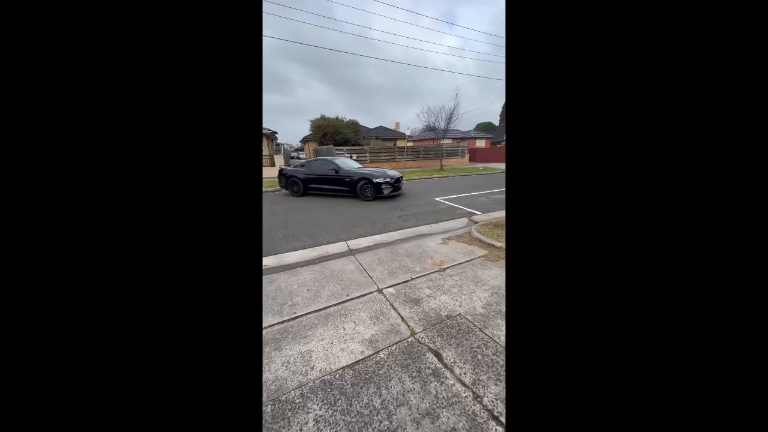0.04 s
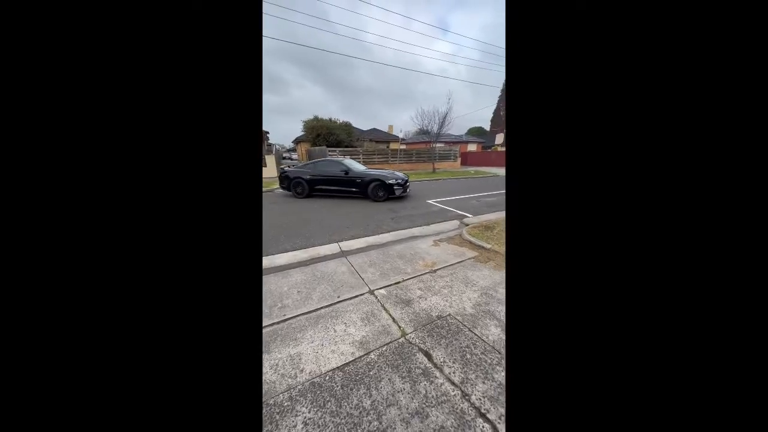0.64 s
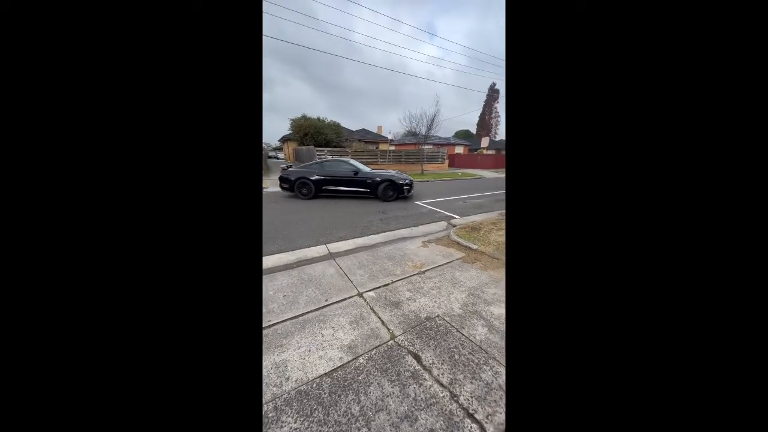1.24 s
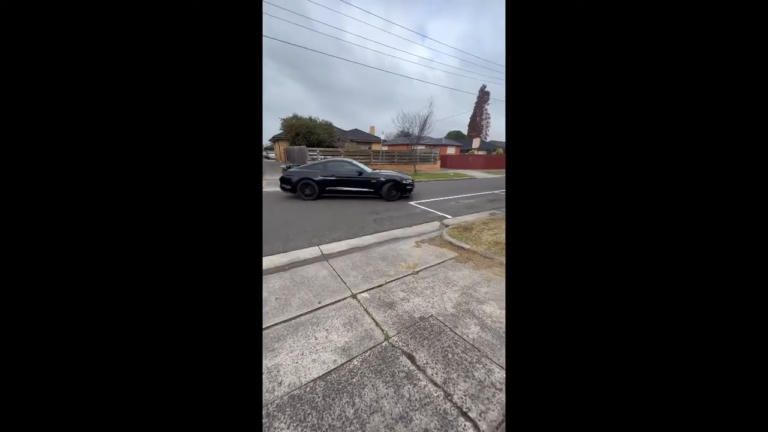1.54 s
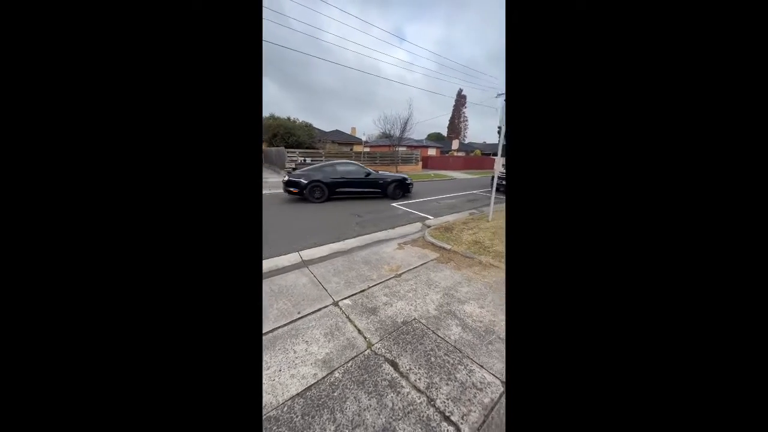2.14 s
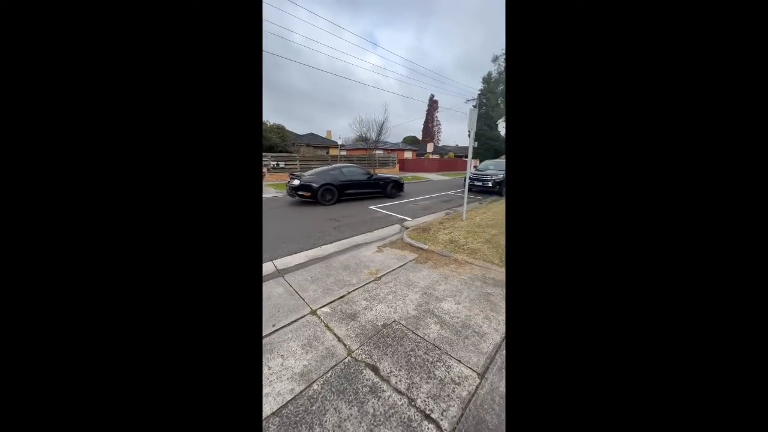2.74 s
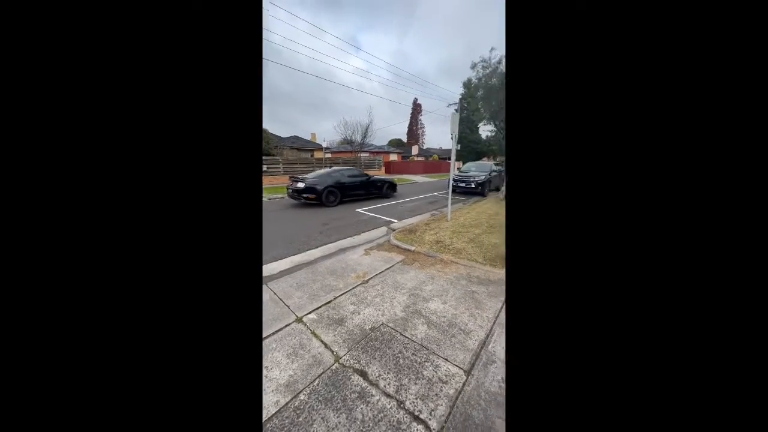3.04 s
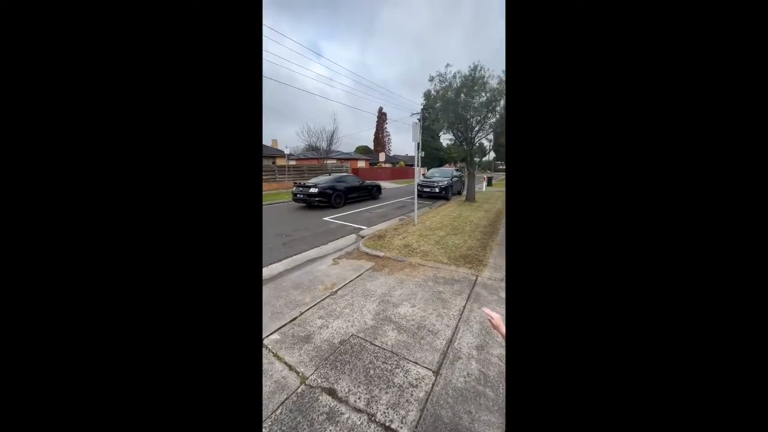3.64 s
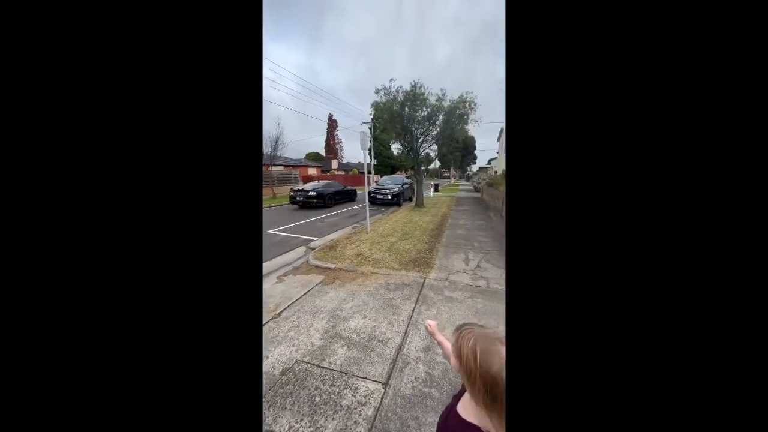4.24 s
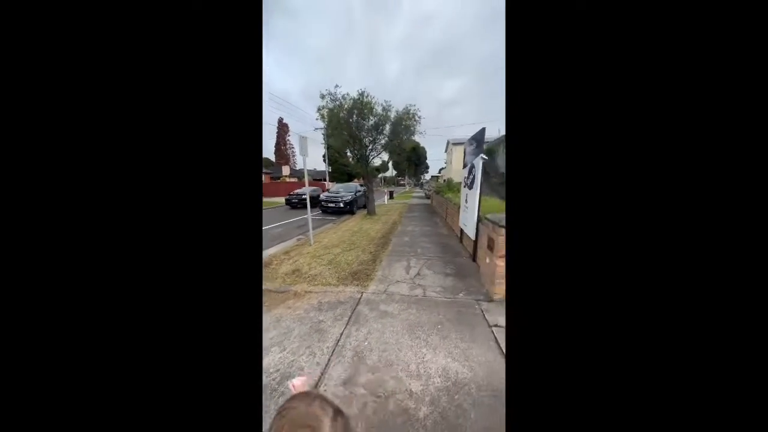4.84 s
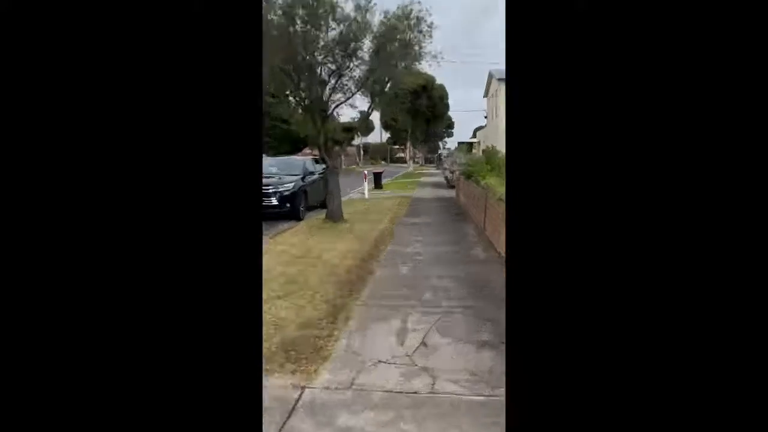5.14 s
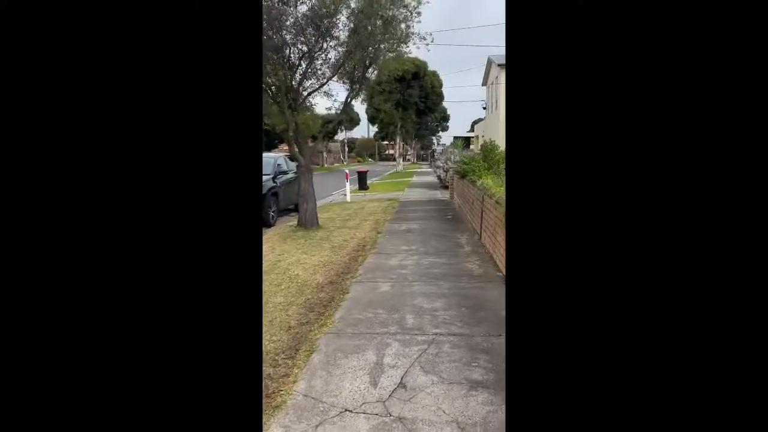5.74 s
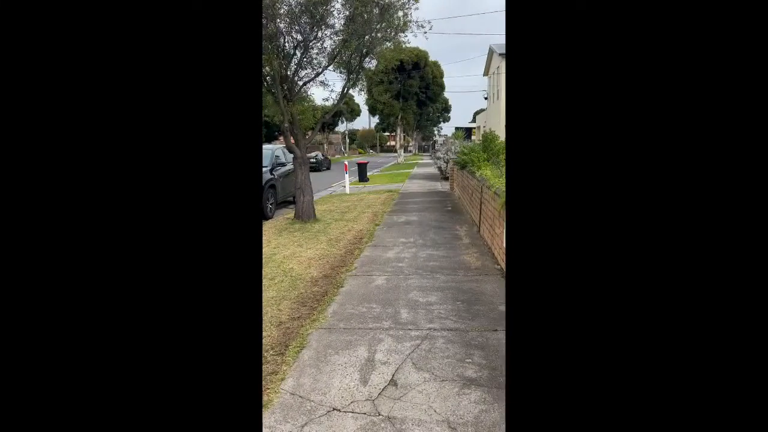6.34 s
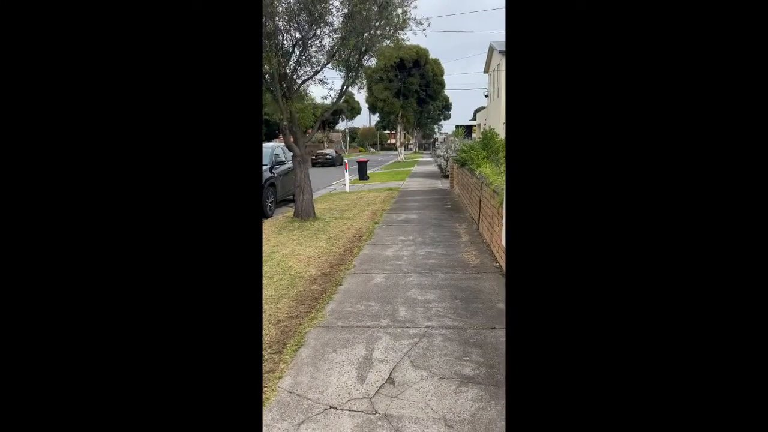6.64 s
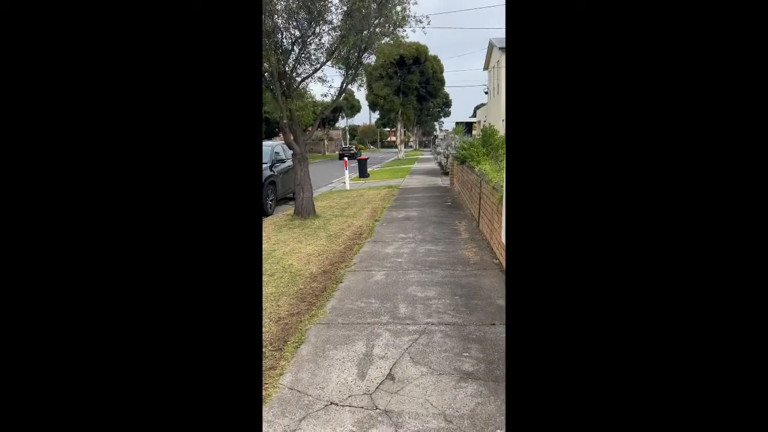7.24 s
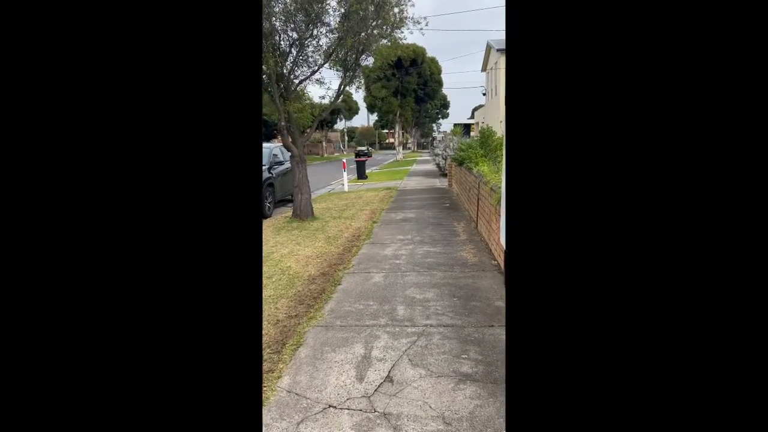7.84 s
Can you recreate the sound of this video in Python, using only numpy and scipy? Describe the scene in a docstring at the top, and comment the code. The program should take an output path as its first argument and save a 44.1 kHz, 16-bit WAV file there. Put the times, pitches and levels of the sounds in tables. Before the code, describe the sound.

A deep, loping V8 rumble is heard from the footpath of a suburban street, with a few ticks of grit, a soft tyre hiss and faint bird chirps. The car accelerates away with a loud growl that climbs in pitch, sags for a moment, then rises much higher and turns raspy. Finally the driver lifts off, leaving a quieter, lower hum echoing off the houses.

```python
"""A suburban corner: a V8 sports car idles, creeps round, accelerates away and lifts off.
The crank sets the period of the exhaust. Uneven pulses from two cylinder banks excite the pipe
resonances, and under load they steepen into shocks that rasp. Road, walls and house fronts reflect
the sound. Tyres and engine bay hiss, grit ticks under the wheels and small birds chirp."""
import sys
import numpy as np
from scipy import signal
from scipy.fft import rfft, irfft, next_fast_len
from scipy.io import wavfile
from scipy.ndimage import uniform_filter1d, minimum_filter1d, map_coordinates

SR = 44100
rng = np.random.default_rng(int(sys.argv[2]) if len(sys.argv) > 2 else 0)


def file_out(sig):
    """Save sig as 16-bit WAV at sys.argv[1]."""
    # one column per channel
    cols = np.atleast_2d(sig).T
    # limit, then scale
    lim = np.clip(cols, -1, 1)
    pcm = np.round(lim * 32767).astype(np.int16)
    wavfile.write(sys.argv[1], SR, pcm)


N = 352359

# crank speed through idle, creep, first gear, second gear and lift-off: time_s, speed_rpm
CRANK_SPEED = [(0.0, 655), (0.65, 640), (1.2, 655), (1.5, 794), (1.75, 876), (2.4, 905), (2.7, 995),
               (2.9, 1105), (3.3, 1570), (3.5, 1885), (4.0, 2535), (4.28, 2979), (4.4, 3024), (4.6, 2644),
               (4.73, 2680), (4.9, 2893), (5.5, 3507), (5.75, 3759), (5.95, 4009), (6.2, 4271), (6.4, 4542),
               (6.65, 4733), (6.9, 4993), (7.05, 5092), (7.24, 5238), (7.6, 3936), (8.0, 3864)]
# how hard the engine works: time_s, effort_db
EFFORT = [(0, -24), (1.3, -25.5), (1.6, -17), (2.7, -14.5), (3.05, -10), (3.4, -3), (3.6, -1.5), (3.9, 0.9),
          (4.4, -0.15), (4.6, -2.5), (4.8, -4.5), (5.3, -7), (5.6, -6), (5.95, -7), (6.4, -4.5),
          (6.6, -2.5), (6.9, -0.5), (7.1, -1.5), (7.3, -2.5), (7.55, -17), (7.75, -24)]
# scatter from firing to firing: time_s, scatter_share
ROUGHNESS = [(2.8, .14), (3.6, .1), (4.4, .07), (5.3, .04), (5.8, .09), (7.05, .07), (7.6, .1)]
# each cylinder's shock, lags in firing intervals: side_lag, side_db, behind_lag, behind_db
SHOCKS = [(.15, 0, -.03, 0), (-.05, -7, -.4, -12), (.1, -14, -.2, -13), (.33, -2, .13, -18),
          (0, -30, 0, -21), (.12, -4, -.07, 0), (.28, -7, -.5, -11), (0, -30, 0, -18)]
# the street's echo of the exhaust: time_s, level_db
STREET_ECHO = [(3, -7), (3.5, -15), (4.6, -18), (7.25, -16), (7.6, -3)]
# spectrum of the hiss: frequency_hz, level_db
HISS_COLOUR = [(3000, 1.5), (4800, 1.5), (5600, 1.5), (7200, -1), (8800, -1.5), (10800, -7), (12200, -17),
               (15500, -14.5)]
# the car starts to pull, turns its tail to the listener, then coasts: start_s, end_s
PULL_S, TURN_S, COAST_S = (3.0, 3.34), (5.5, 6.2), (7.35, 7.7)


def amp(db):
    """Decibels to amplitude ratio."""
    return 10 ** (np.asarray(db) / 20)


def unit(x):
    """Normalisation to rms 1."""
    return x / np.sqrt(np.mean(x ** 2) + 1e-20)


def steady(x, seconds=0.12):
    """Division by the running rms levels x; faster throbs remain."""
    size = int(seconds * SR)
    power = uniform_filter1d(uniform_filter1d(x ** 2, size), size // 2 + 1)
    return x / np.sqrt(np.abs(power) + 1e-14)


def along(points, hz):
    """Interpolation on a logarithmic frequency axis."""
    knots_hz, values = np.transpose(points)
    return np.interp(np.log(hz + 1), np.log(knots_hz + 1), values)


def curve(points):
    """Linear interpolation in time, one value per sample."""
    return np.interp(np.arange(N) / SR, *np.transpose(points))


def ramp(start_s, end_s):
    """A linear rise from 0 to 1."""
    return np.clip((np.arange(N) / SR - start_s) / (end_s - start_s), 0, 1)


def wobble(rate_hz):
    """Smooth random modulation: a spline through Gaussian knots."""
    knots = rng.standard_normal(int(N * rate_hz / SR) + 4)
    return map_coordinates(knots, [np.arange(N) * rate_hz / SR])


def filtered(x, response):
    """Linear filtering: the spectrum times a frequency response."""
    size = next_fast_len(N + SR // 2)
    return irfft(rfft(x, size) * response(np.fft.rfftfreq(size, 1 / SR)), size)[..., :N]


def coloured(x, colour, size=8192):
    """Minimum-phase filtering: folding the cepstrum makes the response causal."""
    cepstrum = irfft(np.log(amp(along(colour, np.fft.rfftfreq(size, 1 / SR)))))
    cepstrum[1:size // 2] *= 2
    cepstrum[size // 2 + 1:] = 0
    return signal.fftconvolve(x, irfft(np.exp(rfft(cepstrum))))[:N]


def band(x, lo_hz, hi_hz, order=12):
    """A zero-phase band-pass filter."""
    return filtered(x, lambda hz: ((1 + (lo_hz / (hz + 1)) ** order) * (1 + (hz / hi_hz) ** order)) ** -.5)


def delayed(x, delay_s):
    """Propagation delay over a changing path."""
    return np.interp(np.arange(N) - delay_s * SR, np.arange(N), x)


def noise(colour):
    """Stereo noise of rms 1, most coherent at long wavelengths."""
    # likeness of left and right: frequency_hz, correlation
    coherence = [(100, .99), (1200, .96), (2200, .88), (4000, .76), (8000, .64), (13000, .4)]

    def response(hz):
        angle = np.arccos(along(coherence, hz)) / 2
        return amp(along(colour, hz)) * [np.cos(angle), np.sin(angle)]

    mid, side = filtered(rng.standard_normal((2, N)), response)
    return unit(np.array([mid + side, mid - side]))


def echo(x, delay_s=.02):
    """Scattering from fences and house fronts leaves a tail whose treble dies first."""
    # reverberation time of the street: frequency_hz, t60_s
    decay = [(100, 1), (1000, 0.54), (4000, 0.09), (12000, 0.018)]
    hz, t, spectra = signal.stft(rng.standard_normal(SR // 2), SR, nperseg=256)
    tail = signal.istft(spectra * amp(-60 * t / along(decay, hz)[:, None]), SR, nperseg=256)[1]
    return signal.fftconvolve(x, np.pad(tail / np.linalg.norm(tail), (int(delay_s * SR), 0)))[:N]


def spread(x, wet_db):
    """Diffuse reflection gives each ear its own echo."""
    return (x + amp(wet_db) * np.array([echo(x), echo(x)])) / np.hypot(1, amp(wet_db))


def street():
    """Broadband ambient noise, quietening as the car leaves."""
    # background spectrum: frequency_hz, level_db
    colour = [(120, -33), (200, -24), (287, -9.5), (540, -19), (775, -22), (1490, -26.5), (5550, -37),
              (10500, -46.5), (11200, -63), (11900, -91), (15000, -71)]
    return amp(-45 - 8 * ramp(5.5, 7)) * noise(colour)


def birds():
    """Gliding whistles with two overtones; random frequency modulation makes them hoarse."""
    # chirps: start_s, length_s, start_hz, middle_hz, end_hz, level_db, overtone_db, hoarseness
    chirps = [(0.033, 0.045, 3720, 3900, 3840, -45, -10, 0.47),
              (0.065, 0.085, 6180, 5400, 5150, -43.5, -18, 0.96),
              (0.503, 0.12, 3600, 3780, 3620, -45, -13, 1.5), (1.554, 0.1, 2850, 3350, 3200, -41, -3, 0.02),
              (1.745, 0.023, 3500, 3740, 3600, -31.5, -28, 0.1),
              (1.805, 0.082, 2940, 3110, 3120, -43, 0, 0.04),
              (2.646, 0.079, 3700, 3910, 3720, -43.5, -11, 1.6),
              (3.093, 0.38, 3000, 3030, 3010, -45.5, -25, 0.13),
              (3.417, 0.072, 4740, 4730, 4700, -37.5, -20, 0.12),
              (3.461, 0.059, 3340, 3670, 3250, -34.5, -7, 0.4),
              (3.511, 0.042, 4420, 4230, 3430, -34, -29, 0.17),
              (3.593, 0.042, 3210, 3250, 3120, -40, -21, 0.03),
              (7.56, 0.099, 3030, 3320, 3200, -75, 19, 0.1), (7.668, 0.092, 3350, 3310, 3280, -56, -4, 0),
              (7.813, 0.091, 3000, 3200, 3280, -62, 1, 0.1), (7.93, 0.09, 3170, 3280, 3150, -73, 4, 0.1)]
    song = np.zeros(N + SR)
    for start_s, length_s, *glide_hz, level_db, overtone_db, hoarseness in chirps:
        progress = np.linspace(0, 1, int(length_s * SR))
        pitch_hz = np.polyval(np.polyfit([0, .5, 1], glide_hz, 2), progress)
        flutter = np.interp(progress * length_s * 1500, np.arange(SR), rng.standard_normal(SR))
        phase = 2 * np.pi * np.cumsum(pitch_hz * (1 + 0.161 * hoarseness * flutter)) / SR
        tone = np.sin(phase) + amp(overtone_db) * (np.sin(2 * phase) + amp(-6.5) * np.sin(3 * phase))
        song[round(start_s * SR):][:len(tone)] += amp(level_db) * np.sin(np.pi * progress) * tone
    return spread(song[:N], wet_db=-8)


def grit(t60_s=.02):
    """Impact noise: stones snap under the tread in exponentially decaying bursts."""
    # snaps: start_s, level_db
    snaps = [(0.9683, -30.5), (1.0056, -28), (1.0977, -25.5), (1.209, -34), (1.3142, -28.5), (1.422, -25.5),
             (1.6462, -29), (2.8676, -43)]
    colour = [(200, -17), (600, 9), (1300, 6), (2800, -2.5), (5000, -26), (12000, -39)]
    ticks, t = np.zeros(N + SR), np.arange(SR // 10) / SR
    for start_s, level_db in snaps:
        envelope = amp(level_db + 2 - 60 * t / t60_s)
        ticks[round(start_s * SR):][:len(t)] += envelope * rng.standard_normal(len(t))
    return spread(coloured(ticks[:N], colour), wet_db=-8)


def scrub(fade_s=.07):
    """Friction noise: steered rubber twists on the asphalt with a grainy hiss."""
    # steering movements: start_s, length_s, level_db
    scrubs = [(0.818, 1.27, -49.5), (1.668, 0.34, -50), (2.046, 0.24, -50.5)]
    level = sum(amp(db) * (ramp(s, s + fade_s) - ramp(s + length_s - fade_s, s + length_s))
                for s, length_s, db in scrubs)
    return level * amp(1.8 * wobble(9.3) + 1.7 * wobble(300)) * noise(HISS_COLOUR)


def per_firing(cycle):
    """Random modulation with one knot at each of a cycle's eight firings."""
    return map_coordinates(rng.standard_normal(N // 50), [cycle * 8], order=2, mode="wrap")


def flow(cycle):
    """Flow noise: the rush of tyres and engine bay and a hiss grow with effort and flutter with firings."""
    # spectrum of the rush: frequency_hz, level_db
    rush_colour = [(300, -31), (600, 22), (1100, 14), (1600, 9.5), (2200, 9.5), (2700, 1.5), (3800, 0.5),
                   (4800, -7.5), (6000, -74), (9000, -63)]
    effort_db, coasting = curve(EFFORT), ramp(*COAST_S)
    rush = amp(-33.5 + 0.86 * effort_db + 7.4 * coasting + 2 * per_firing(cycle)) * noise(rush_colour)
    hiss = amp(-40.5 + effort_db - 8 * coasting + 1.8 * per_firing(cycle)) * noise(HISS_COLOUR)
    return rush + hiss


def overrun(cycle):
    """With the throttle shut, a few orders (harmonics of the four-stroke cycle rate) hum on."""
    # partials of the hum: order, level_db
    partials = {2: -46.5, 5: -52, 6: -48, 7: -41.5, 8: -36, 11: -38.5, 12: -47, 13: -50.5}
    # its swell as the throttle shuts: time_s, gain_db
    swell = [(7.15, -90), (7.33, 6), (7.42, 6), (7.56, 7), (7.7, 0), (7.99, -0.5)]
    hum = sum(amp(db + 0.5 * wobble(9.9)) * np.cos(2 * np.pi * order * cycle + 0.39 * wobble(9.1))
              for order, db in partials.items())
    return np.sqrt(2) * amp(curve(swell)) * hum


def stages():
    """Crossfade weights for creeping, pulling side-on and being heard from behind."""
    pulling, behind = ramp(*PULL_S), ramp(*TURN_S)
    return 1 - pulling, pulling - behind, behind


def firings(cycle, lags, strengths_db, without=(), size=4096):
    """Fourier series of one pulse per cylinder per cycle, less the listed orders."""
    slots = (np.arange(len(lags)) + lags) / len(lags)
    harmonics = np.exp(-2j * np.pi * np.outer(np.arange(size // 16), slots)) @ amp(strengths_db)
    harmonics[[0, *without]] = 0
    return unit(np.interp(cycle % 1, np.arange(size) / size, irfft(harmonics, size)))


def shocks(cycle, lags, strengths_db, puff_s):
    """Each shock front trails a decaying puff of turbulence."""
    rough = curve(ROUGHNESS)
    pulses = firings(cycle + .001 * per_firing(cycle), lags, strengths_db)
    pulses *= np.exp(2 * rough * per_firing(cycle))
    puff_power = signal.lfilter([1], [1, -np.exp(-1 / (puff_s * SR))], pulses ** 2)
    return unit(pulses) + 5 * rough * unit(np.sqrt(puff_power) * rng.standard_normal(N))


def tailpipes(x):
    """Pipe modes ring; interference with the road's reflection adds a comb that rises with distance."""
    # tailpipe modes: centre_hz, width_hz, level_db
    modes = [(870, 160, -2.5), (1268, 320, -2.5), (1740, 130, -2.5), (2390, 470, -7.5), (3220, 580, -0.5),
             (3930, 810, -5.5), (5080, 500, -13.5)]
    # lag of the road's reflection: time_s, delay_s
    road_lag = [(6, .0015), (6.45, .00125), (6.8, .00106), (6.95, .00097), (7.25, .00081)]

    def response(hz):
        return sum((-1) ** k * amp(db) * 1j * hz * width / (centre ** 2 - hz ** 2 + 1j * hz * width)
                   for k, (centre, width, db) in enumerate(modes))

    direct = filtered(x, response)
    return direct + 0.8 * delayed(band(direct, 1400, 9000, order=6), curve(road_lag))


def rasp(cycle):
    """Nonlinear steepening: under load the pulses become shocks, rich in high harmonics."""
    # side-on spectrum: frequency_hz, level_db
    colour = [(500, -53), (720, -6.5), (900, -6.5), (1100, -9), (1400, -11), (1750, -21), (2100, -29.5),
              (3000, -42.5), (6000, -23), (12000, -25)]
    # reflections from road, kerb and underbody: delay_s, gain
    bounces = [(.0011, 0.25), (.0027, -0.13), (.0046, .4), (.0072, 0.045)]
    # the rasp's body, dipping in the shadow of a parked car: time_s, gain_db
    shade = [(3.5, -4), (4.3, 0.5), (5.2, 2), (5.6, -1), (6.1, -4.5), (6.6, -1), (7.2, -3.5)]
    # echo, strong in that shadow and at lift-off: time_s, level_db
    reflected = [(3.55, 3), (3.9, -11), (4.4, -12), (4.8, -18), (5.3, -16), (5.8, -5), (6.4, -2),
                 (6.8, -12), (7.05, -12), (7.25, -6), (7.6, 3)]
    # brassy overtones: time_s, level_db
    brass_level = [(2.8, -78), (3.2, -60), (3.9, -85), (4.4, -44), (4.7, -53), (5.2, -35), (5.7, -58),
                   (6.1, -40), (6.4, -40), (7.3, -44), (7.6, -53)]
    # bright edge heard from behind: time_s, level_db
    edge_level = [(5.8, -58), (6.35, -46.5), (6.7, -36.5), (6.82, -32.5), (6.92, -30.5), (7.04, -29.5),
                  (7.14, -40), (7.3, -34.5), (7.45, -47.5)]
    side_lags, side_db, behind_lags, behind_db = np.transpose(SHOCKS)
    side = coloured(shocks(cycle, side_lags, side_db, puff_s=.002), colour)
    side = filtered(side, lambda hz: 1 + sum(gain * np.exp(-2j * np.pi * hz * s) for s, gain in bounces))
    behind = tailpipes(shocks(cycle, behind_lags, behind_db, puff_s=.0015))
    turned, wet = ramp(5.82, 6.36), amp(curve(reflected))
    body = np.sqrt(1 - turned) * steady(band(side, 780, 1800))
    body += np.sqrt(turned) * steady(band(behind, 720, 2050))
    octaves = np.log2(curve(CRANK_SPEED) / 3000)
    body_db = -28 + 0.91 * curve(EFFORT) + 4 * octaves + 2.5 * ramp(*COAST_S) + curve(shade)
    body = amp(body_db) * ramp(3.5, 3.501) * steady(body + wet * echo(body))
    brass = amp(curve(brass_level)) * ramp(2.7, 3) * steady(band(side, 1850, 2600))
    edge = steady(band(behind + wet * echo(behind), 1470, 7800))
    edge *= amp(curve(edge_level)) * ramp(5.55, 5.551) * (1 - ramp(6.8, 7.7))
    return spread(body, wet_db=-22) + spread(brass + edge, wet_db=-9)


def silencer(hz, trips_s=(.0031, .0053), bounce=0.55):
    """All-pass response: round trips in the chambers smear each pulse without colouring it."""
    delays = np.exp(-2j * np.pi * np.outer(trips_s, hz))
    return np.prod((delays - bounce) / (1 - bounce * delays), axis=0)


def walls(x):
    """Interference with wall reflections fades the orders in and out as the detours shrink."""
    # reflections: near_delay_s, far_delay_s, gain
    paths = [(0.01219, 0.00786, 0.59), (0.0062, .0042, -0.27)]
    away = ramp(PULL_S[0], COAST_S[1])
    reflected = sum(gain * delayed(x, near_s + (far_s - near_s) * away) for near_s, far_s, gain in paths)
    return x + ramp(*PULL_S) * reflected


def radiation(growth, creep_db, pull_db, behind_db, coast_db):
    """Directivity and load set a band's gain; growth is in dB per dB of effort."""
    creeping, pulling, behind = stages()
    facing_db = creeping * creep_db + pulling * pull_db + behind * behind_db
    return amp(growth * curve(EFFORT) + facing_db + coast_db * ramp(*COAST_S))


def beat(cycle):
    """Source and filter: uneven pulses of the two banks ring the pipes in a ragged beat."""
    # cylinders in firing order: lag_intervals, creep_db, pull_db, behind_db
    cylinders = [(-0.029, 6, -3.5, 1.5), (-0.0825, -6, -1, 10.5), (-0.00093, 5.5, 3.5, -24),
                 (-0.0394, 10, 7, 11.5), (-0.031, -30, -8, -59), (-0.049, 6.5, 3, 1.5),
                 (0.0426, 5.5, 3, 16), (0.129, -0.5, -0.5, 1)]
    # pipe response: frequency_hz, creep_db, pull_db, behind_db
    pipe = [(31.5, -0.5, 13, 14), (49.6, 10, -15, -8), (69.6, -9.5, 25, 11), (87, -9, -34, -28),
            (117, -5.5, 7, -7.5), (157, -18, 9, -4.5), (234, -14.5, 11.5, 8.5), (288, -11, -1.5, -12),
            (353, -15, 7.5, -12), (457, -27, -2, -7.5), (684, -28.5, -5, -10), (790, -55, -22, -23.5),
            (900, -41.5, -21.5, -31.5)]
    # orders left out of the pulses, one row for each stage
    omitted = [
        [1, 2, 3, 5, 6, 8, 9, 16],
        [1, 2, 3, 4, 5, 6, 8, 15, 16],
        [1, 2, 5, 6, 9, 11],
    ]
    # the beat gives way to the drone: time_s, gain_db
    raggedness = [(3.85, -1), (4.2, -6.5), (4.9, -3.5), (5.5, -4), (6.2, -2.5)]
    lags, *strengths = np.transpose(cylinders)
    hz, *colours = np.transpose(pipe)
    rough = curve(ROUGHNESS)
    jitter = .006 * rough * per_firing(cycle)
    chuff = amp(-13) * ramp(*PULL_S) * rng.standard_normal(N)  # turbulent gas under load
    gas = 0
    for share, strengths_db, colour_db, orders in zip(stages(), strengths, colours, omitted):
        pulses = firings(cycle + jitter, lags, strengths_db, without=orders)
        pulses *= 1 + rough * per_firing(cycle) + chuff
        gas += share * steady(coloured(pulses, np.c_[hz, colour_db]))
    gas = walls(filtered(gas, silencer))
    first_rev = ramp(3.55, 3.75) - ramp(4.0, 4.3)
    gas += 0.52 * first_rev * band(gas, 325, 380, order=40)  # a chamber resonance sings
    gas += amp(curve(STREET_ECHO)) * echo(gas)
    lope = amp(5.5 * stages()[0] * np.cos(2 * np.pi * (cycle - .8)))  # one swell a cycle at low speed
    boom = steady(band(gas, 45, 180))
    boom *= radiation(growth=0.68, creep_db=-14, pull_db=-27.5, behind_db=-29, coast_db=2)
    growl = lope * steady(band(gas, 227, 330))
    growl *= radiation(growth=1.69, creep_db=-9, pull_db=-21, behind_db=-30.5, coast_db=20)
    bark = steady(band(gas, 382, 1130))
    bark *= radiation(growth=1.28, creep_db=-20, pull_db=-18, behind_db=-21.5, coast_db=4)
    return amp(curve(raggedness)) * (boom + growl + bark)


def drone(cycle):
    """Forced resonance: orders swell as they cross pipe modes; side-on they align into thumps."""
    # resonances, order 8 being the firing rate: order, centre_hz, width_hz, level_db
    resonances = [(2, 65, 16.8, -27.0), (3.013, 96, 57, -31), (3.993, 141, 39, -26),
                  (5.005, 160.7, 58.4, -18.5), (5.984, 460, 87, 4.0), (7, 79, 19, -20.5), (7, 237, 78, -26),
                  (8, 63.4, 15.6, 1), (8, 108, 46, -13.5), (8, 182, 28, -17), (8, 227, 41, -18.5),
                  (8, 327, 54, -32), (9.04, 308, 90, -23), (10, 274, 150, -31), (11, 61, 9, -13),
                  (11, 150, 46, -23.5), (11, 415, 180, -25), (12.03, 411, 220, -26.5), (13, 49, 11.5, 2.5),
                  (13, 183, 78, -22), (13, 2070, 1030, -15), (13.97, 440, 200, -28.0), (15, 391, 127, -22),
                  (16, 81, 29, -6), (16, 234, 128, -17), (16, 620, 81, -27.5), (17, 260, 120, -27.5),
                  (17, 435, 48, -23.5), (17, 665, 120, -33.0), (18, 270, 76, -25.5), (18, 339, 41, -19.5),
                  (18, 660, 190, -32), (18.97, 440, 180, -27.5), (20.13, 470, 150, -24),
                  (20.97, 610, 262, -32), (21.97, 490, 400, -33), (23.04, 530, 206, -26.5),
                  (24.02, 430, 220, -28), (25, 250, 120, -26), (25, 590, 120, -34),
                  (25.83, 620, 270, -34.5), (27, 545, 230, -33), (27, 1090, 160, -39.5),
                  (27.93, 590, 280, -32.5), (29.1, 3260, 1350, -24.5), (29.9, 2850, 1720, -24.5),
                  (30.96, 650, 390, -39), (31.9, 1140, 592, -35.5)]
    trail_cycles, trail_orders = .2, 25  # the bass trails each shock; from order 25 up nothing does
    cycle_hz, effort_db = curve(CRANK_SPEED) / (2 * 60), curve(EFFORT)
    lags, side_db, _, _ = np.transpose(SHOCKS)
    slots = (np.arange(len(lags)) + lags) / len(lags)
    _, side_on, behind = stages()
    moving = ramp(*PULL_S)
    tone = 0
    for order in sorted({row[0] for row in resonances}):
        power = sum(amp(db) ** 2 / (1 + ((order * cycle_hz - hz) / width) ** 2) ** 3
                    for k, hz, width, db in resonances if k == order)
        level = amp(effort_db + moving * wobble(6)) * np.sqrt(2 * power)
        pipe_phase = -2 * np.pi * order * (.55 + .022 * order)  # high orders leave the pipes later
        trail = trail_cycles * trail_orders * (1 - max(1 - order / trail_orders, 0) ** 2) / 2
        thump = -amp(side_db) @ np.exp(-2j * np.pi * (order * slots + trail))
        alignment = side_on * np.angle(thump * np.exp(-1j * pipe_phase))
        drift = .06 * order * behind * wobble(6)  # phases wander as the path changes
        tone += level * np.cos(2 * np.pi * order * cycle + pipe_phase + alignment + drift)
    tone *= 1 - ramp(*COAST_S)
    return tone + amp(curve(STREET_ECHO) - 2) * echo(moving * band(tone, 130, 1500))


def placed(x):
    """The car's bearing sets level and time differences between the two microphones."""
    # level difference: time_s, left_minus_right_db
    pan = [(0, -1.5), (1.2, -1), (2.5, -2.5), (3.7, -2), (4.6, -1.5), (5.2, -2.5), (5.7, -3), (7, -2.5),
           (7.99, -3)]
    # later arrival on the left: time_s, delay_s
    left_lag = [(0, 2e-5), (.7, 7e-5), (1.3, 7e-5), (2.2, 2.5e-5), (3.7, 2e-5), (4.2, 0)]
    return np.array([delayed(x[0], curve(left_lag)), x[1]]) * amp(np.outer([.5, -.5], curve(pan)))


def scene():
    """Superposition of car and street; one crank phase drives every engine sound."""
    cycle = .88 + np.cumsum(curve(CRANK_SPEED)) / (2 * 60 * SR)  # two turns per four-stroke cycle
    exhaust = placed(drone(cycle) + overrun(cycle) + beat(cycle) + rasp(cycle))
    return street() + exhaust + flow(cycle) + scrub() + grit() + birds()


def record(dry, ceiling=.92, top_hz=15800):
    """Transduction by two slightly unequal microphones, then peak limiting and a low-pass."""
    # difference in sensitivity: frequency_hz, left_minus_right_db
    balance = [(60, 3), (280, 3.5), (550, 4.5), (1000, 3.5), (4000, 1.5), (8000, -0.1)]
    x = filtered(dry, lambda hz: amp(np.outer([.5, -.5], along(balance, hz))))
    needed = 1 / np.maximum(1, np.abs(x).max(axis=0) / ceiling)
    gain = uniform_filter1d(minimum_filter1d(needed, size=400), size=300)
    return filtered(x * gain, lambda hz: hz < top_hz)


dry = scene()
out = record(dry)
file_out(out)
```